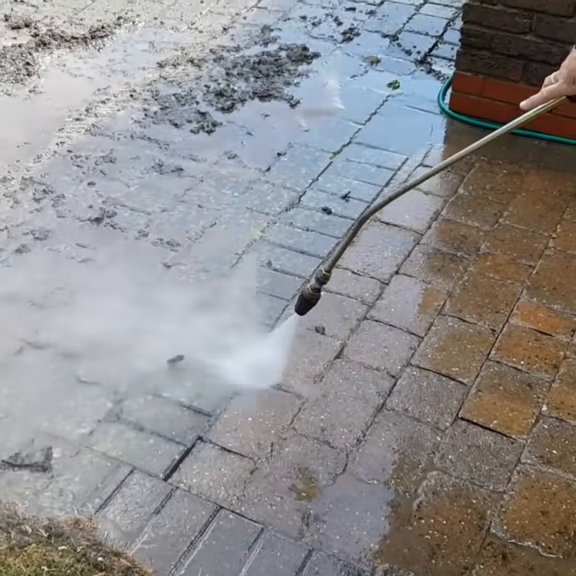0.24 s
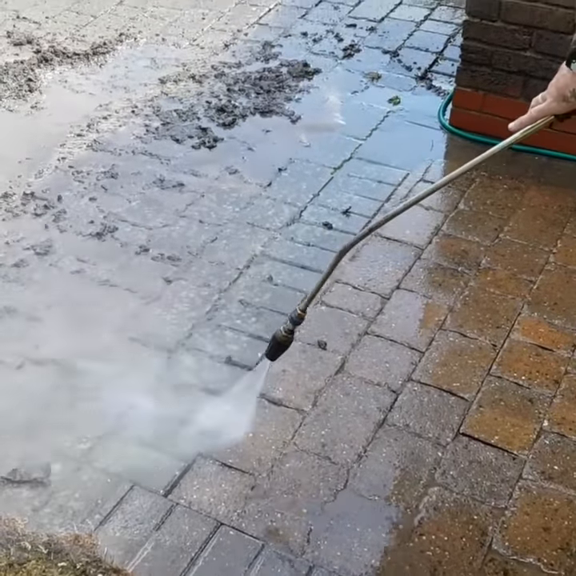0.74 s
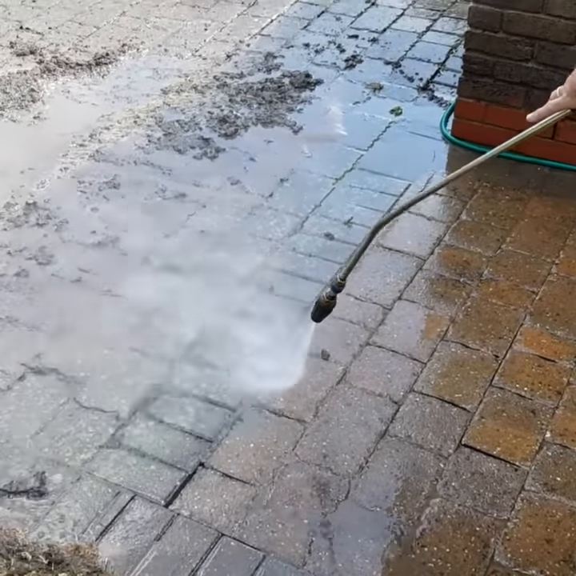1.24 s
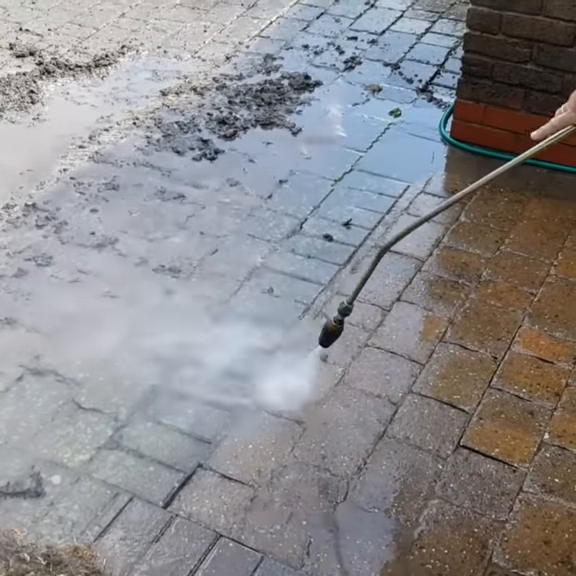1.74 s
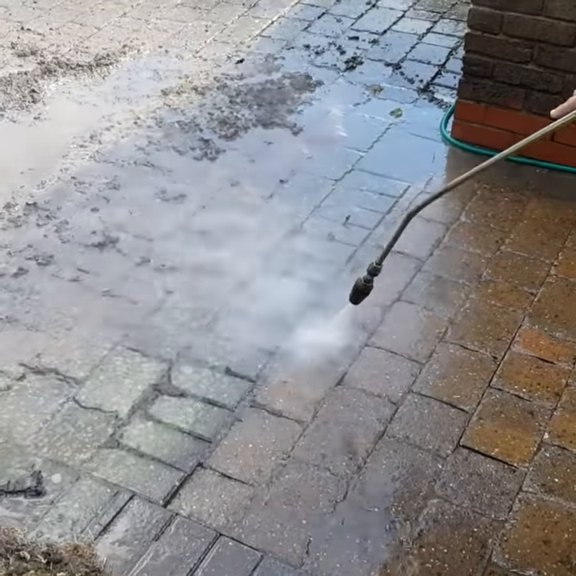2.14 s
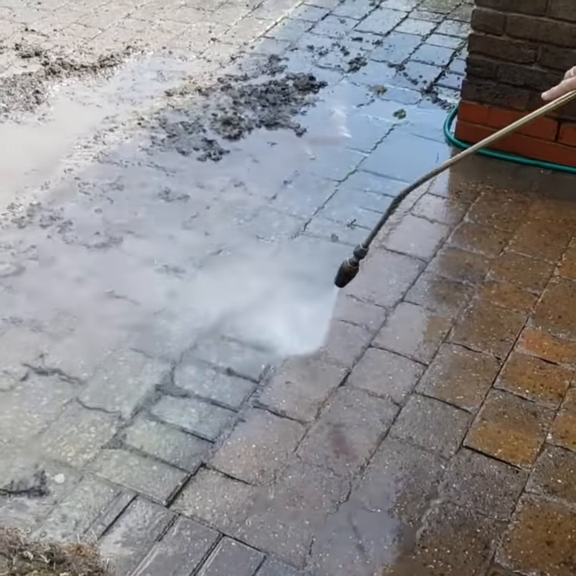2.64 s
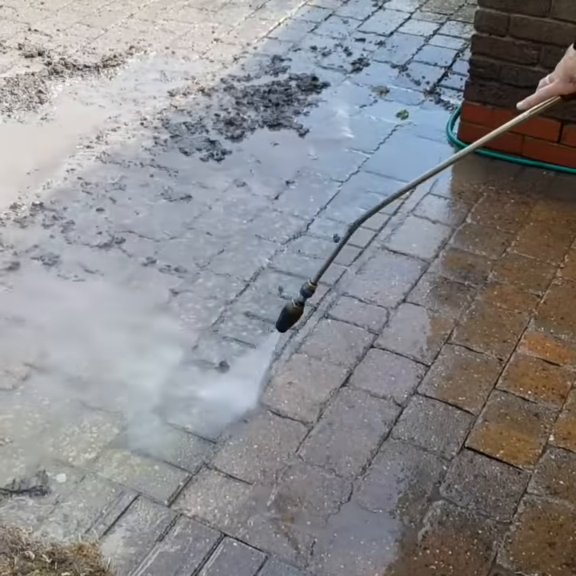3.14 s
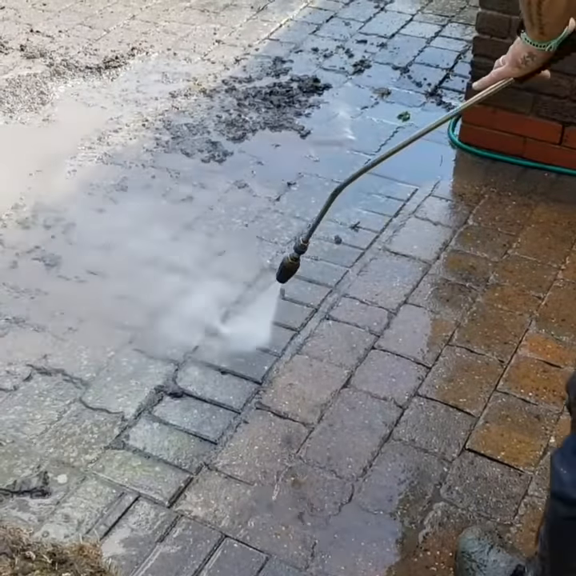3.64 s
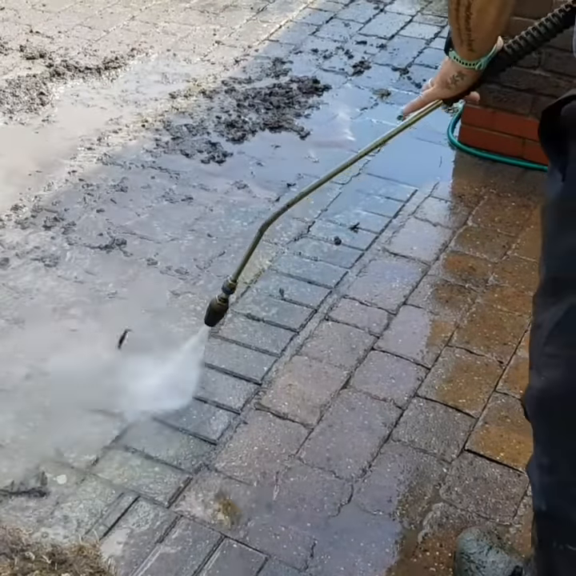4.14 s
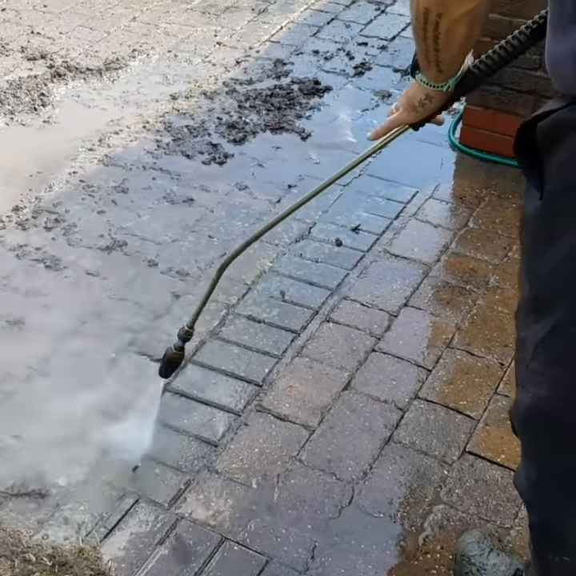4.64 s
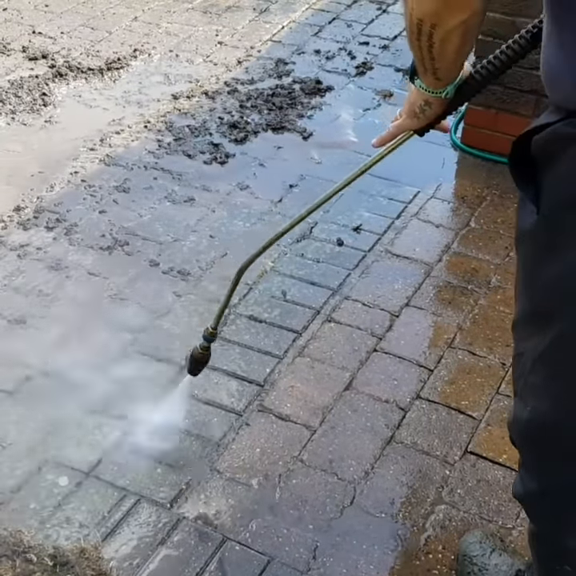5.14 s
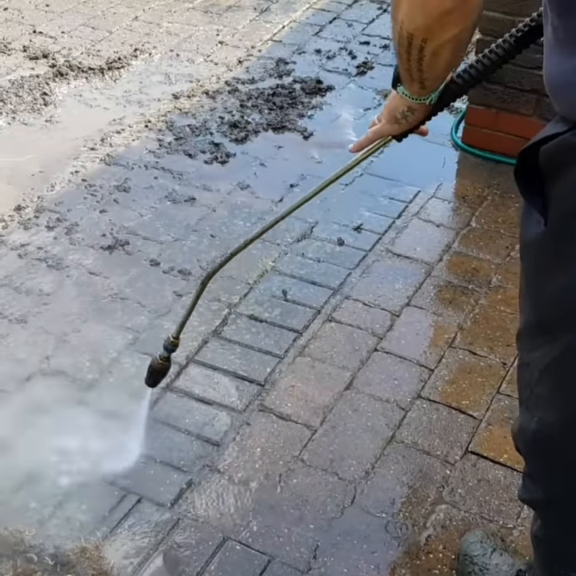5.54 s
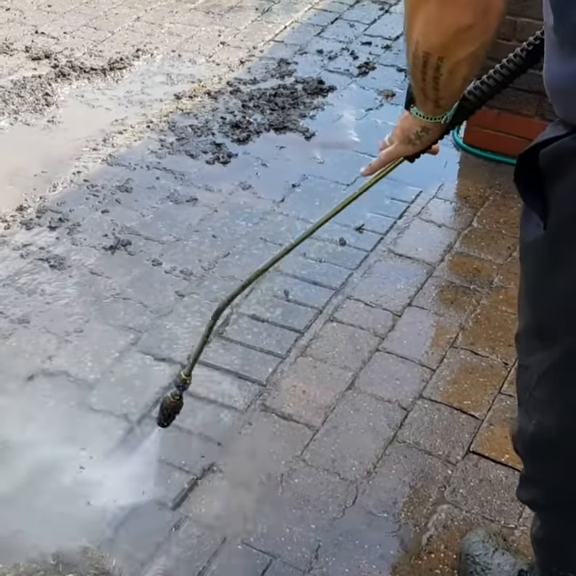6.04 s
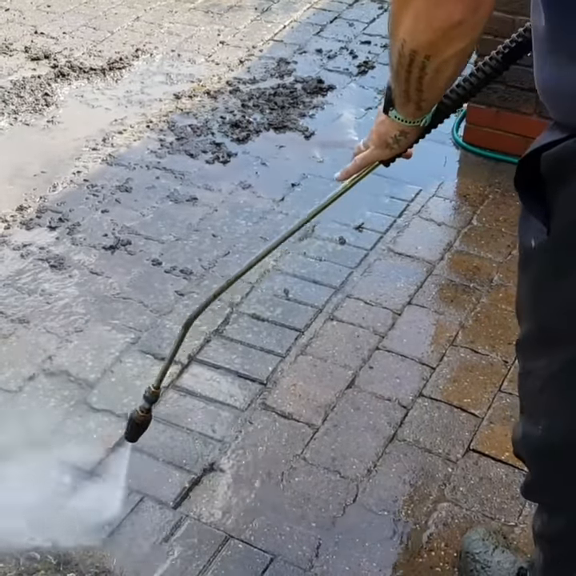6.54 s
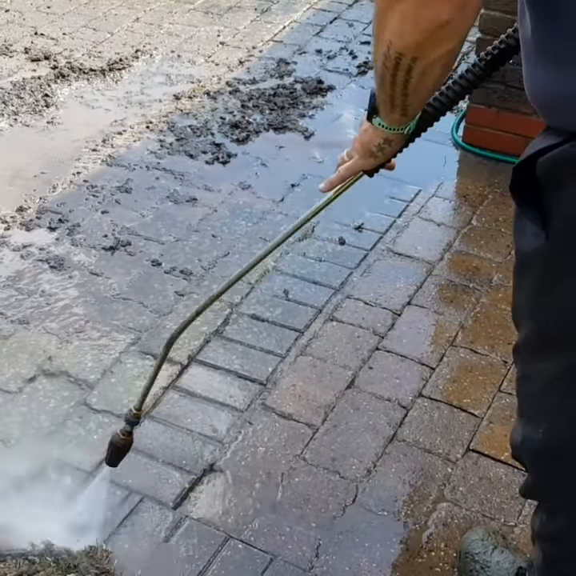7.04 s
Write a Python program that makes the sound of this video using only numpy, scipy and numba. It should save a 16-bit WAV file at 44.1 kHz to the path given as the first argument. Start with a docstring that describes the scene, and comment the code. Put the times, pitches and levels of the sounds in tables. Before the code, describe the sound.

A pressure washer is already running at 0 s and never stops through about 7.3 s. Its spinning nozzle drives water onto wet block paving outdoors, giving dense bright hiss and fizz, a fast low buzz near 180 pulses a second, and gritty midrange slaps. Until about 3.8 s, to-and-fro strokes make the splash swell and recede, fullest around 1.5, 2.3 and 3.1 s, with a glassy high sheen and short uneven rings near 2 s. From about 4 to 5.4 s the drumming is firmer, with a subdued nasal ring, while the splash thins and the spray drifts left. Around 6.15-6.4 s a stronger hollow, gliding ring jumps out, then the sizzling spray carries on, easing slightly at the end. Faint motor hum and low water rumble lie underneath. Stereo phone pickup, about two metres away, with little room echo.

```python
"""Bright hiss and fizz throb over a drumming tone: a pressure washer's spinning nozzle sweeps wet block
paving outdoors, two metres from a phone with two microphone ports. The pencil jet circles about 181 times
a second; it drums partials of that rate on the stones, slaps the joints with nearly repeating noise bursts,
sets off passing rings and brighter slaps, and throws up splash, fizz and hiss that throb with the turn.
The pump motor hums further off over low water rumble, and the spray drifts left with the lance's strokes."""
import sys
import numpy as np
from scipy import signal
from scipy.fft import rfft, irfft, next_fast_len
from scipy.io import wavfile
from scipy.ndimage import map_coordinates
from numba import njit

SR = 44100
rng = np.random.default_rng(int(sys.argv[2]) if len(sys.argv) > 2 else 0)


def output_pcm(signal):
    """Save a mono or channel-first signal as 16-bit PCM at the path in sys.argv[1].

    Samples are clipped to [-1, 1] before scaling.
    """
    pcm = np.clip(np.atleast_2d(signal).T, -1, 1) * 32767
    wavfile.write(sys.argv[1], SR, np.round(pcm).astype(np.int16))


N = 322047

# the two microphone ports: (frequency [Hz], left over right from ahead [dB], more of it from far left [dB],
# right port's phase behind the left [rad], share of noise power common to both [0-1])
PORTS = [(60, 1.8, 1, 0, .72), (700, 2.4, 0, -.2, .68), (1600, -1.5, 1, -.6, .62),
         (2100, -5.8, 1.5, -.8, .45), (2600, -1.5, -1, .5, .45), (3900, 1, -1.5, 1.4, .55),
         (5200, -1.5, 4.5, .9, .45), (6400, -1.5, 3.5, 1.8, .55), (7700, 8, -2, 4.2, .45),
         (9000, 4.4, -3.5, 5.7, .62), (10000, 5, -4, 6.0, .56), (11600, -2.5, 1, 6.0, .56),
         (12900, -3.3, 2.5, 6.65, .63), (15700, 1.7, -3, 7.2, .45)]
FAR_LEFT_US = 100  # right port's delay at which the far-left columns apply in full [us]
OPPOSITE = np.array([[1], [-1]])  # up on the left port, down on the right


def undb(db):
    """Gain of a level in dB."""
    return 10 ** (np.asarray(db) / 20)


def unit(x):
    """Scale to an rms of one, taken over both ports together if there are two."""
    return x / np.sqrt(np.mean(x ** 2))


def curves(table):
    """Columns of a timed table joined by straight lines, one value a sample."""
    s, *columns = np.transpose(table)
    return [np.interp(np.arange(N) / SR, s, c) for c in columns]


def eased(table):
    """Columns of a timed table that slow to rest at every row, like a swinging arm."""
    s, *columns = np.transpose(table)
    row = np.interp(np.arange(N) / SR, s, np.arange(len(s)))
    row = np.floor(row) + np.sin(np.pi / 2 * (row % 1)) ** 2
    return [np.interp(row, np.arange(len(s)), c) for c in columns]


def at(table, hz):
    """Columns of a frequency table, read on a log-frequency axis."""
    f, *columns = np.transpose(table)
    return [np.interp(np.log(hz), np.log(f), c) for c in columns]


def walk(rate):
    """Random values, rate a second, joined by lines; the values spread near one."""
    points = int(N / SR * rate) + 2
    values = rng.standard_normal(points)
    return 0.959 * np.interp(np.arange(N) * rate / SR, np.arange(points), values)


def ports(colour, lo_hz, hi_hz, lag_us):
    """A band of coloured noise at both ports: one shared part, later on the right, and one part each."""
    size = next_fast_len(N)
    hz = np.fft.rfftfreq(size, 1 / SR)
    inside = (hz >= lo_hz) & (hz < hi_hz)
    centre = (lo_hz + hi_hz) / 2
    chance = rng.standard_normal((2, 3, inside.sum()))
    spectrum = undb(at(colour, hz[inside])[0])
    shared, left, right = (chance[0] + 1j * chance[1]) * spectrum
    pan_db, _, behind, alike = at(PORTS, hz[inside])
    same = np.sqrt(np.clip(alike, 0, 1))
    apart = np.sqrt(np.clip(1 - alike, 0, 1))
    to_left, to_right = undb(pan_db / 2), undb(-pan_db / 2)
    late = same * shared * np.exp(-1j * behind) * to_right
    bins = np.zeros((4, len(hz)), complex)
    bins[:, inside] = (same * shared + apart * left) * to_left, apart * right * to_right, late, -1j * late
    left, right, late, quarter = irfft(bins, size)[:, :N]
    # a moving delay turns the phase of a narrow band
    angle = 2 * np.pi * centre * lag_us / 10 ** 6
    both = np.array([left, right + late * np.cos(angle) + quarter * np.sin(angle)])
    # the phone's body shades each port differently as the source turns
    turn_db = at(colour, centre)[1] + at(PORTS, centre)[1] / 2 * OPPOSITE
    return both * undb(turn_db * lag_us / FAR_LEFT_US)


def sideways(x, lag_us):
    """One sound at both ports: each favours its own frequencies; the right is later as the lance moves left."""
    size = next_fast_len(N)
    pan_db, _, behind, _ = at(PORTS, np.fft.rfftfreq(size, 1 / SR) + 1)  # 1 Hz up keeps the log finite
    responses = np.array([undb(pan_db / 2), undb(-pan_db / 2) * np.exp(-1j * behind)])
    left, right = irfft(rfft(x, size) * responses, size)[:, :N]
    heard_from = np.arange(N) - lag_us * SR / 10 ** 6
    return np.array([left, map_coordinates(right, [heard_from], mode="mirror")])


@njit
def svf(x, hz, damping):
    """State-variable band-pass with a moving centre, gain 1 there; damping is width over centre."""
    y, band, low = np.empty(len(x)), 0., 0.
    for i in range(len(x)):
        g = np.tan(np.pi * hz[i] / SR)
        v = (band + g * (x[i] - low)) / (1 + g * (g + damping))
        band, low, y[i] = 2 * v - band, low + 2 * g * v, damping * v
    return y


def edges_met(turns, memory, burst, jitter, firm=0):
    """The jet meets nearly the same stone edges each turn, so a noise burst nearly repeats; firm adds a knock.

    burst: decay [turns]; jitter: wander in place [turns]; memory: share carried to the next turn."""
    points = 244  # noise points in one turn
    rows = rng.standard_normal((int(turns[-1]) + 3, points))
    rows = signal.lfilter([1], [1, -memory], rows, axis=0)
    rows = rows * (np.exp(-np.arange(points) / points / burst) + 0.099)
    rows = rows + firm * np.exp(-np.arange(points) / 2)  # the same knock each turn
    place = (turns + 1 + jitter * walk(60)) * points
    return np.interp(place, np.arange(rows.size), rows.ravel())


def motor_hum():
    """The distant pump motor: fixed-pitch sine lines that waver a little in level and phase."""
    # motor lines before wavering: (frequency [Hz], rms level [dB])
    lines = [(48, -51.5), (96, -64), (136, -59.5)]
    t, hum = np.arange(N) / SR, 0
    for hz, db in lines:
        gain = np.sqrt(2) * undb(db + 0.37 * walk(5))
        hum = hum + gain * np.sin(2 * np.pi * hz * t + 0.18 * walk(2.9))
    return hum


def water_rumble(lag_us):
    """Low rumble of the water: six bands of coloured noise, each wandering in level."""
    # rumble colour: (frequency [Hz], relative density from ahead [dB per Hz], more from far left [dB])
    rumble_colour = [(18, -35, 0), (30, -7.5, -2), (123, -7, -1), (307, -4, 0.8), (486, -10, 3.5),
                     (700, -17.5, 2.2)]
    level_db = -45.5
    edges, rumble = np.geomspace(30, 640, num=7), 0
    for lo, hi in zip(edges[:-1], edges[1:]):
        rumble = rumble + ports(rumble_colour, lo, hi, lag_us) * undb(1.5 * walk(6.0))
    return unit(rumble) * undb(level_db)


def drum(turns, *levels_db):
    """The lowest partials of the circling blow, each wavering and shifting between the ports."""
    pan_db = 2.5  # left over right
    out = 0
    for k, db in enumerate(levels_db, start=1):
        gain = np.sqrt(2) * undb(db + 1.54 * walk(25))
        partial = gain * np.sin(2 * np.pi * k * turns + 0.42 * walk(20))
        out = out + partial * undb(1.4 * walk(3.02) * OPPOSITE)
    return out * undb(pan_db / 2 * OPPOSITE)


def passing_rings(turns):
    """Blows once a turn excite a gliding resonance that swells and fades; some blow spills past the ring."""
    # rings and brighter slaps under the jet: (start [s], end [s], start frequency [Hz], end frequency [Hz],
    # ring level before swell and flutter [dB], damping of each filter pass [width over centre])
    ring_events = [(0.24, 0.357, 2340, 2390, -33, 0.26), (1.73, 1.83, 2210, 2280, -33, 0.51),
                   (1.955, 2.02, 2600, 2600, -36, 0.22), (1.95, 2.024, 1750, 1800, -35, .4),
                   (2.135, 2.165, 1000, 1300, -30, .6), (2.15, 2.19, 2300, 2700, -30, .45),
                   (2.192, 2.24, 1100, 1000, -34, .6), (2.25, 2.318, 1900, 2490, -28.5, .6),
                   (2.57, 2.694, 1500, 1900, -33.5, 0.74), (3.09, 3.182, 2400, 2100, -30, .4),
                   (4.065, 4.125, 900, 950, -30, 0.59), (4.156, 5.422, 1820, 1920, -37.5, 0.44),
                   (4.29, 5.426, 1000, 1070, -39, 0.65), (5.763, 6, 1970, 2050, -34, 0.28),
                   (6.15, 6.162, 1500, 1400, -31, 0.9), (6.157, 6.24, 1180, 1330, -22, .45),
                   (6.16, 6.25, 766, 830, -32.5, 0.33), (6.18, 6.245, 1800, 1950, -32, .4),
                   (6.215, 6.325, 2350, 2600, -28, .6), (6.235, 6.335, 1930, 1600, -27, .45),
                   (6.31, 6.38, 2150, 2250, -32, .4), (6.36, 6.62, 2050, 1900, -33.5, 0.28),
                   (6.402, 6.408, 2400, 2400, -31, 1.4)]
    rise, fall, longest_s = 0.3, 0.37, 0.029  # shares of the event's time, and the cap on both [s]
    spill_db, flutter_db = -9, 1.3
    t, out = np.arange(N) / SR, np.zeros(N)
    blows = edges_met(turns, memory=0.65, burst=0.15, jitter=0.028, firm=4)
    for start, end, hz0, hz1, db, damping in ring_events:
        span = (t > start) & (t < end)
        now, blow, damping = t[span], blows[span], float(damping)
        hz = np.interp(now, [start, end], [hz0, hz1])
        swell = (now - start) / min(rise * (end - start), longest_s)
        fade = (end - now) / min(fall * (end - start), longest_s)
        inside = np.clip(np.minimum(swell, fade), 0, 1)
        ring = unit(svf(svf(blow, hz, damping), hz, damping))
        spill = unit(svf(svf(blow, 1.57 * hz, 0.67), 1.57 * hz, 0.67))
        out[span] += (ring + undb(spill_db) * spill) * inside * undb(db)
    return out * undb(flutter_db * walk(20))


def joints(turns, db, centre_hz):
    """The repeating slap: bursts once a turn, broadly coloured by the wet joints."""
    slap = edges_met(turns, memory=0.846, burst=0.45, jitter=0.016)
    ring = svf(svf(slap, centre_hz, 5.7), np.full(N, 1300.), 4.1)
    ring = signal.sosfilt(signal.butter(3, 900, "high", fs=SR, output="sos"), ring)
    return unit(ring) * undb(db)


def spray(turns, levels_db, lag_us):
    """Narrow bands of water noise that throb with the turn, flicker and spit droplets."""
    # water colour: (frequency [Hz], relative density from ahead [dB per Hz], more from far left [dB])
    water_colour = [(550, -18, -0.5), (1700, -13.5, 0.5), (1750, -9.5, 0), (2830, -11, -7),
                    (3250, -15.5, 24), (3650, -13, 13), (3950, -7, 5.5), (4450, -8.5, 8.5),
                    (4850, -8.5, 13.5), (5400, -8, 11), (5870, -11.5, 3.5), (6840, -8, 4.5), (8470, 0, 4.5),
                    (10270, -3, 3), (12100, 0.5, 3), (12900, 1.5, 0), (14000, 0.5, 2), (15140, -2.5, 11.5),
                    (15850, 6.5, -15)]
    # layers from slap to hiss: (top frequency [Hz], once-a-turn throb depth [dB], flicker [dB],
    # droplet scatter [dB])
    layers = [(3134, -1, 0.47, 3), (4599, -1, 3.56, 2.5), (7004, -2, 1, 1.5), (11073, 1.24, 1.5, 2.0),
              (15990, 2, 1.4, 0.5)]
    out, lo_hz = 0, 560
    for (top_hz, throb_db, flicker_db, drops_db), db in zip(layers, levels_db):
        edges = np.linspace(lo_hz, top_hz, num=6)
        # the loud side of the circle wanders as the jet crosses stones and joints
        side, twice = 1.1 * walk(2.57), 1.06 * walk(2.34)
        spit, layer = walk(1500), 0
        for lo, hi in zip(edges[:-1], edges[1:]):
            angle = 2 * np.pi * turns + side + 0.92 * walk(4)
            throb = np.cos(angle) + 1.8 * np.cos(2 * angle + twice) + 0.58 * np.cos(3 * angle + 2 * twice)
            moves_db = throb_db * throb + flicker_db * walk(9) + drops_db * spit
            layer = layer + ports(water_colour, lo, hi, lag_us) * undb(moves_db)
        # each port carries, on average, twice the power of the listed level
        out = out + unit(layer) * np.sqrt(2) * undb(db)
        lo_hz = top_hz
    return out


def sheen(water):
    """A resonant peak in the hiss slides in frequency and swells."""
    # bright peak: (time [s], centre [Hz], lift [dB])
    bright_peak = [(0.0, 13200, 9), (0.27, 13100, 5), (0.5, 13400, 7), (0.8, 12900, 9), (1.03, 12900, 4),
                   (1.2, 12900, 7.5), (1.65, 12900, 7.5), (1.8, 12800, 6), (2.0, 12750, 7),
                   (2.15, 12800, 2), (2.4, 12900, 5), (2.52, 12700, 8.5), (2.85, 12850, 5.5),
                   (3.12, 12700, 4), (3.27, 12700, 3.5), (3.52, 12700, 2.5), (3.8, 12650, 6),
                   (4.05, 12600, 3), (4.3, 12930, 3), (4.62, 12700, 2), (4.9, 12900, 2), (5.3, 13000, 3.5),
                   (5.55, 13000, 3), (5.8, 13000, 3), (6.15, 13000, 0), (6.35, 13000, 3), (6.85, 13100, 1),
                   (7.3, 12900, 4)]
    hz, lift_db = curves(bright_peak)
    damping = 0.084  # width over centre
    return np.array([x + (undb(lift_db) - 1) * svf(x, hz, damping) for x in water])


def scene():
    """Spray, slaps, rings and drumming share the nozzle's turn; the pump runs on its own."""
    # ends of the lance's to-and-fro strokes, drifting left: (time [s], right port's delay [us],
    # then levels before surges: hiss [dB], fizz [dB], splash [dB], low splash [dB])
    strokes = [(0.0, 2, -22.5, -26, -29.5, -29.5), (0.3, 19, -21.5, -25, -30.5, -30),
               (0.62, -18, -22.5, -23.5, -26.5, -29), (1.04, 16, -20.5, -23, -28.5, -30.5),
               (1.47, -15, -20.5, -22.5, -24, -26.5), (1.8, 11, -20.5, -22, -28.5, -31),
               (2.26, -43, -19, -22, -23, -28.5), (2.72, 5, -21, -24, -26, -29),
               (3.08, -30.5, -19.5, -23, -23.5, -27), (3.5, 25, -21, -24.5, -29.5, -32),
               (3.83, 6, -19.5, -24, -27, -31), (4.27, 49, -20.5, -24, -31.5, -35),
               (4.62, 31, -19, -24, -29.5, -33), (5.03, 76, -20.5, -25, -34, -36.5),
               (5.55, 49, -19, -23, -33, -35), (5.86, 71, -20.5, -25, -36, -36.5),
               (6.18, 46, -20, -24.5, -34.5, -35.5), (6.45, 75, -22, -24.5, -35, -37),
               (6.72, 75, -20.5, -25, -37, -40.5), (7.0, 93.5, -21.5, -26.5, -35.5, -41.5),
               (7.3, 88, -23.5, -27.5, -40, -40.5)]
    # slap in the joints before wandering: (time [s], level [dB], repeating part over that level [dB])
    slaps = [(0.0, -32, -2), (0.1, -29.5, -4), (0.22, -31, -8), (0.3, -31.5, 5), (0.43, -30.5, -16),
             (0.47, -27.5, -13), (0.62, -33.5, 2.5), (0.76, -30.5, -1.5), (0.88, -28.5, -4),
             (1.05, -29.5, -4), (1.24, -27.5, -8), (1.4, -33.5, 5.5), (1.6, -29.5, -5), (1.78, -27.5, -1),
             (1.88, -30.5, -9), (2.02, -30, -9), (2.06, -35, -10), (2.1, -36.5, -4), (2.14, -31, 1),
             (2.22, -32.5, -3), (2.25, -32, -7), (2.31, -33, -9), (2.35, -34, -8), (2.43, -30.5, -2),
             (2.51, -32, -9), (2.58, -31, -2), (2.77, -27.5, -2.5), (2.91, -30.5, -5), (3.15, -30, -1),
             (3.19, -30, -4), (3.45, -29.5, -1.5), (3.75, -31, -4.5), (4.05, -31.5, -3.5),
             (4.09, -28.5, -4.5), (4.4, -28.5, -3), (4.8, -29, 1), (5.18, -29, 1), (5.42, -29, -6),
             (5.5, -31, -9), (5.69, -30.5, -9), (5.92, -30, 7.5), (6.0, -26.5, -1.5), (6.06, -32.5, -2),
             (6.148, -31, -12), (6.16, -27.5, -2), (6.4, -28.5, -5), (6.53, -29.5, 4), (6.65, -30, -1.5),
             (7.05, -32, -4), (7.3, -30, 2)]
    # drumming on the stones before wandering: (time [s], first partial [dB], second [dB], upper partials [dB])
    drumming = [(0.0, -55, -50, -46), (0.12, -39.5, -43.5, -53), (0.45, -44, -46, -50),
                (0.67, -47, -51, -50), (0.84, -43, -45, -48), (1.02, -39, -41, -46.5), (1.2, -43, -49, -46),
                (1.52, -45.5, -42, -47), (1.79, -37.5, -41.5, -47), (1.97, -43, -42, -45),
                (2.03, -51, -51, -54), (2.12, -50, -50, -47), (2.25, -52, -45, -46), (2.37, -52, -45, -52),
                (2.44, -49.5, -48.5, -48), (2.72, -40, -42.5, -40), (2.81, -49, -49, -44),
                (2.93, -40.5, -48, -58), (3.1, -35.5, -46, -51), (3.25, -45, -50, -48),
                (3.42, -40, -41, -44), (3.62, -46, -46, -41.5), (3.88, -39.5, -54, -51),
                (4.05, -44, -45, -46), (4.12, -39, -40.5, -45), (4.29, -36.5, -45.5, -40),
                (4.57, -44, -51, -37.5), (4.92, -37.5, -41.5, -45), (4.96, -37, -49, -40),
                (5.29, -40, -48.5, -41), (5.43, -40.5, -39, -46.5), (5.88, -40, -49.5, -43.5),
                (6.02, -39, -40.5, -47), (6.15, -42, -40, -43), (6.24, -47, -48, -38.5),
                (6.36, -41, -43, -55), (6.53, -36, -43, -40.5), (6.69, -42, -43, -51),
                (6.85, -39.5, -46, -44), (7.14, -39, -49, -51), (7.2, -54, -45, -42), (7.3, -52, -41, -56)]
    # third to fifth partial over the upper level: one value each [dB]
    upper_offsets_db = [-9, -5, -5]
    turn_hz, slap_hz = 180.56, 1870  # mean turns a second; middle of the slap's wandering centre

    turns = np.cumsum(turn_hz + 0.4017 * walk(8)) / SR
    lag_us, hiss_db, fizz_db, splash_db, low_db = eased(strokes)
    slap_db, repeat_db = curves(slaps)
    first_db, second_db, upper_db = curves(drumming)

    # stones and joints pass under the jet in no order: slap, ring and upper partials come and go
    slap_db = slap_db + 0.66 * walk(14)
    repeat_db = repeat_db + 1.74 * walk(12)
    centre_hz = slap_hz * (1 + 0.097 * walk(4.8))
    drum_db = [first_db, second_db + 1.0 * walk(14)]
    drum_db += [upper_db + db + 3.9 * walk(15) for db in upper_offsets_db]

    surge_db = 0.61 * walk(9)  # common to all the spray
    spray_db = [slap_db - 3.5 + surge_db]
    spray_db += [db + surge_db + 0.63 * walk(8) for db in (low_db, splash_db, fizz_db, hiss_db)]

    far = motor_hum() + water_rumble(lag_us)
    stones = joints(turns, slap_db + repeat_db, centre_hz) + passing_rings(turns)
    water = sheen(spray(turns, spray_db, lag_us))
    return far + drum(turns, *drum_db) + sideways(stones, lag_us) + water


def record(dry):
    """The phone rounds the highest peaks and cuts the top steeply."""
    top_hz = 15740
    rounded = np.tanh(.75 * dry) / .75
    return signal.sosfilt(signal.ellip(16, .3, 100, top_hz, fs=SR, output="sos"), rounded)


dry = scene()
out = record(dry)
output_pcm(out)
```